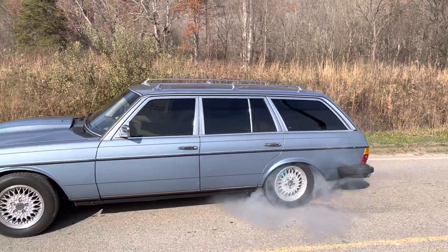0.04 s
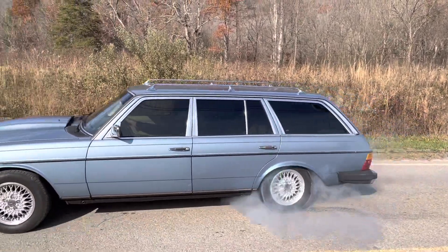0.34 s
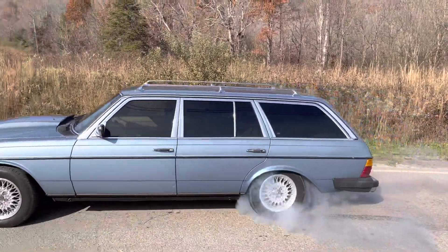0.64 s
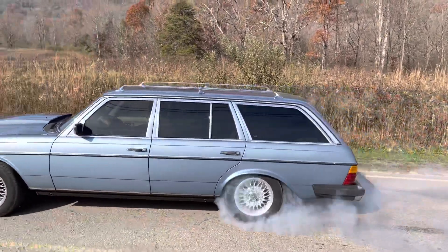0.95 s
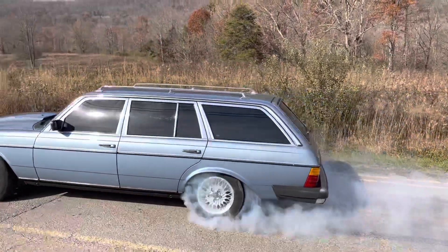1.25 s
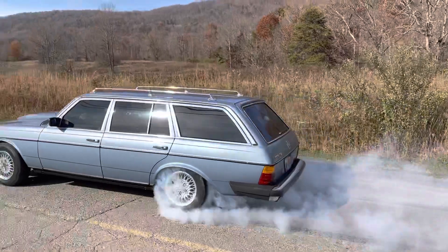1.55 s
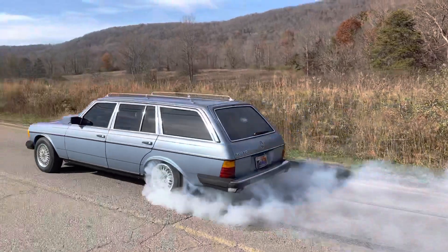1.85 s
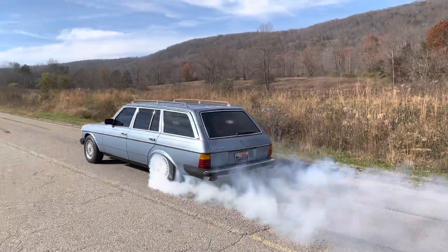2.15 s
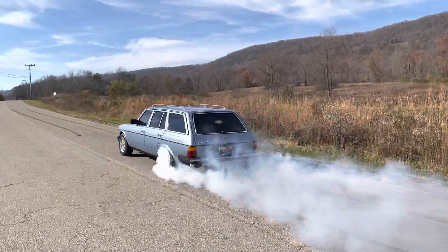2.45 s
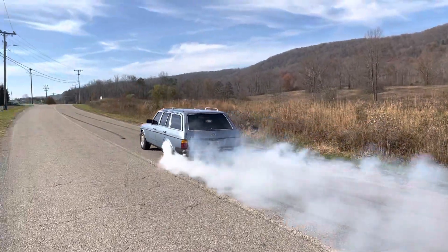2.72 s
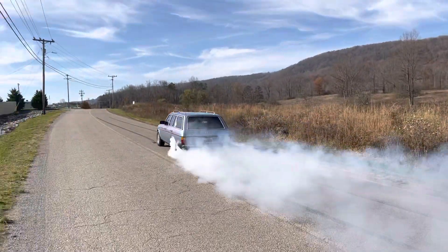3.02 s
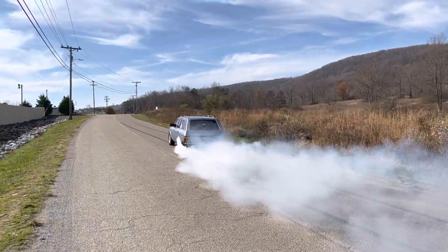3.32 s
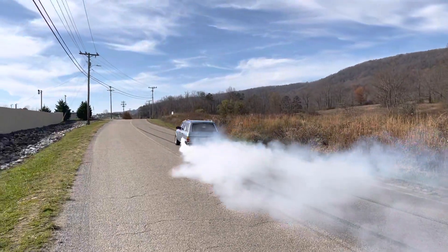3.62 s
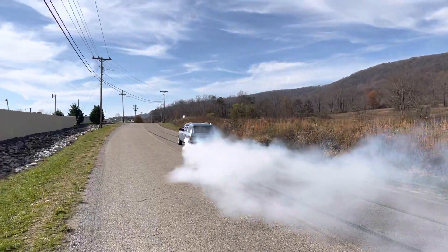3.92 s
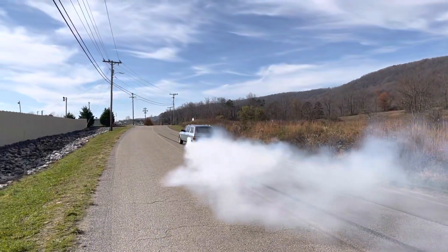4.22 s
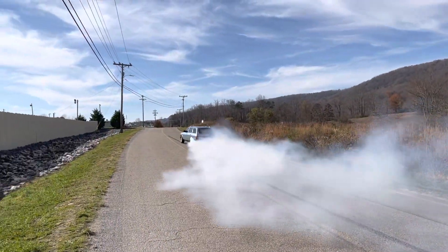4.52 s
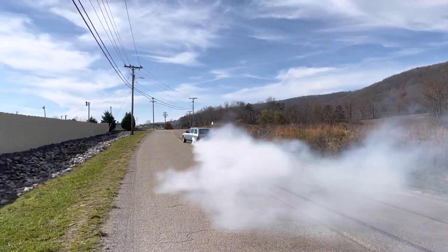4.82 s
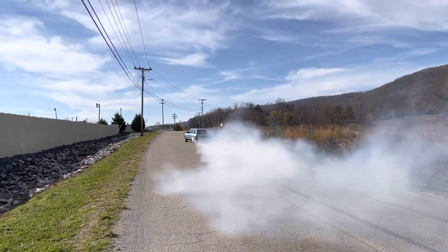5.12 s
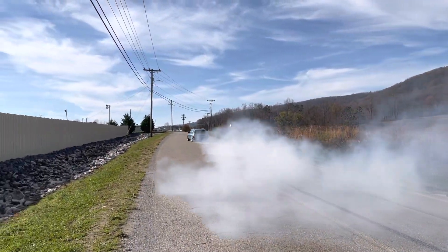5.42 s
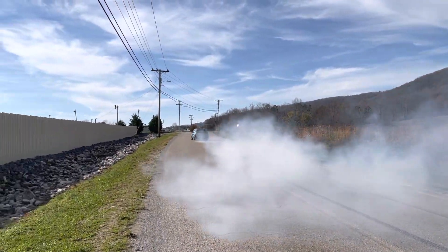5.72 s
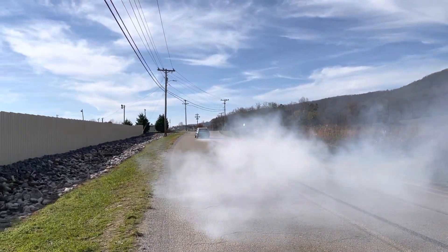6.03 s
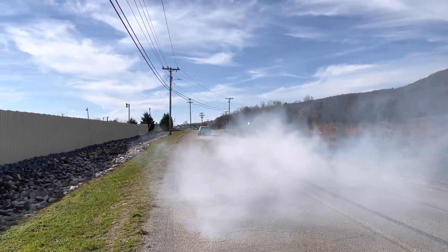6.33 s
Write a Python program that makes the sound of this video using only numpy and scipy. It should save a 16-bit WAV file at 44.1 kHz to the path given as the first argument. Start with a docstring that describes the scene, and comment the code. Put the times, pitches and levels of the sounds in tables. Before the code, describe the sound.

A V8 estate car creeps past close by in a burnout, its exhaust droning and rasping at high revs while the spinning tyres squeal, scrub and hiss on asphalt. The revs dip briefly, then hold as the car pulls away, the tyres chirping and whining more faintly. Far down the open country road the tyres grip and the revs fall, leaving a low, throbbing boom. Heard in stereo from the roadside.

```python
"""V8 burnout on a country road

A V8 estate car creeps past with its wheels spinning and drives off. Its exhaust drones on harmonics
(orders) of the engine cycle, shaped by resonance, and rasps with every firing. Sliding friction makes
the tyres scrub and hiss; stick-slip makes them squeal, chirp and whine. Far down the road the tyres
grip, the revs drop and a throbbing boom is left."""
import sys
import numpy as np
from scipy import signal
from scipy.fft import rfft, irfft, next_fast_len
from scipy.io import wavfile

SR = 44100
rng = np.random.default_rng(int(sys.argv[2]) if len(sys.argv) > 2 else 0)


def master_out(mix):
    """Clip the mix to full scale and print it as 16-bit PCM to the path in sys.argv[1]."""
    frames = np.transpose(np.atleast_2d(mix))
    ceiling = np.clip(frames, -1, 1)
    pcm = np.round(ceiling * 32767).astype(np.int16)
    wavfile.write(sys.argv[1], SR, pcm)


N = 284886
TIME = np.arange(N) / SR
TURN_START_S, TURN_S = 1.55, 0.53   # the car turns its tail to the listener
GRIP_S, GRIP_FADE_S = 4.56, 1.2     # the tyres regain their grip


# brief swells and dips of single exhaust orders: centre_s, length_s, order, gain_db
ORDER_SWELLS = [(0.047, 0.27, 16, 7), (.08, .2, 15, -1), (0.099, 0.3, 2, -3), (0.129, 0.18, 18, 7.5),
                (0.254, 0.28, 17, 10.5), (.3, .25, 12, 6), (.35, 0.84, 19, -18), (.35, 1, 20, -16),
                (0.41, 0.27, 15, 5.5), (.4, 0.25, 6, -11), (.5, 0.28, 10, -3), (0.55, 0.44, 16, 13.5),
                (.6, .35, 17, 0), (.67, 0.14, 15, 2), (.6, 0.33, 2, 2.5), (0.602, 0.49, 5, 7.5),
                (0.651, 0.16, 6, 2), (.7, .4, 14, -9), (.73, 0.25, 4, -9), (.85, .3, 12, -10),
                (0.882, 0.36, 13, -10), (1.024, 0.34, 5, 7), (1.22, 0.4, 8, 7), (1.296, 0.18, 3, 2),
                (1.45, .35, 5, -4), (1.45, 0.49, 9, 1), (1.47, 0.51, 18, 2), (1.57, 0.18, 19, 3.5),
                (1.547, 0.46, 19, 6.5), (1.62, 0.26, 6, -5), (1.673, 0.77, 8, -5.5), (1.733, 0.37, 15, 10),
                (1.801, 0.39, 7, 6.5), (1.9, 1, 17, -18), (1.92, 0.23, 10, 6), (2.1, .3, 9, -9),
                (2.4, 0.23, 18, 2), (2.499, 0.63, 12, 3), (2.7, 0.53, 19, 2), (2.903, .7, 6, -1.5),
                (3.28, 0.53, 2, -7), (3.701, 0.23, 3, 4.5), (3.85, 0.55, 5, 4), (3.951, .8, 9, 5),
                (4.4, 0.41, 13, -13), (4.8, 0.57, 8, -5), (5.03, .3, 4, 5), (5.033, .3, 6, 1.5),
                (5.099, .35, 7, 6), (5.197, .1, 8, -5), (5.313, 0.24, 6, -8), (5.404, 0.49, 8, 11.5),
                (5.794, .34, 8, 5), (5.9, 0.34, 6, 2.5), (6.1, .55, 7, 4.5), (6.324, 0.34, 8, 7.5),
                (6.357, 0.38, 6, 0)]

def engine_order(cycle_phase, order, level_db, waver_db, scatter_turns=1):
    """Harmonic motion: one partial, phase-locked to the engine cycle and wavering in strength."""
    swell_db = sum(db * bump(s, length) for s, length, k, db in ORDER_SWELLS if round(k) == order)
    phase = order * cycle_phase + scatter_turns * rng.uniform(0, 2 * np.pi)
    return np.sqrt(2) * from_db(level_db + swell_db + waver_db * drift(7.1)) * np.sin(phase)


# silencer resonances: frequency_hz, gain_db
SILENCER_RESPONSE = [(45, -21.5), (60, -2), (76, 1.5), (100, -11), (125, 4.5), (142, 9.5), (160, 8),
                     (185, 6), (210, 2.5), (260, 12.5), (285, 10), (310, -2), (520, 0.2), (590, 7.5),
                     (680, -1.5)]

def strong_orders(cycle_phase, cycle_hz, orders, doubling_loss_db, waver_db, scatter_turns=1):
    """Resonance and directivity: orders sweep through the silencer's peaks as the tailpipe turns."""
    behind = ramp(TURN_START_S, TURN_S)
    distance_db = doubling_loss_db * distance_doublings()
    out = 0
    for order, alongside_db, behind_db in orders:
        hz = round(order) * cycle_hz
        source_db = alongside_db + (behind_db - alongside_db) * behind
        # once the tyres grip, orders below 95 Hz fall away
        grip_db = -16 * ramp(GRIP_S, GRIP_FADE_S) / (1 + (hz / 95) ** 20)
        level_db = source_db + at_hz(SILENCER_RESPONSE, hz) - distance_db + grip_db
        out += engine_order(cycle_phase, round(order), level_db, waver_db, scatter_turns)
    return out


# weak orders fed by uneven cylinders: order, gain_db
BURBLE_ORDERS = [(3, -1), (9, -0.5), (10, 3), (11, -0.5), (12, 2.5), (13, 5), (14, 2.5), (21, -2.5),
                 (22, 1.5), (23, -6), (24, 4.5), (25, 2.5), (26, 1), (27, 0.5), (28, -0.5), (29, 6),
                 (30, -6.5), (32, 2)]
# exhaust pipe resonances: frequency_hz, gain_db
PIPE_RESPONSE = [(55, -4), (80, 1.5), (120, -1), (154, 22), (190, 1.5), (230, 1.5), (280, 3.5), (325, -3.5),
                 (360, -7), (410, 3), (490, -5.5), (600, 3), (740, -7), (1000, -6), (1300, -4)]

def weak_orders(cycle_phase, cycle_hz):
    """Periodicity: unequal cylinders repeat once a cycle, filling in orders between the strong ones."""
    burble_db = layer_db(-39, doubling_loss_db=3.9, spin_share=0.62) - 3 * ramp(GRIP_S, GRIP_FADE_S)
    out = 0
    for order, gain_db in BURBLE_ORDERS:
        hz = round(order) * cycle_hz
        # far off, the higher orders sink into the noise
        sink_db = -6.5 * ramp(3.57, 1.15) * np.clip((hz - 279) / 70, 0, 1)
        level_db = burble_db + gain_db + at_hz(PIPE_RESPONSE, hz) + sink_db
        out += engine_order(cycle_phase, round(order), level_db, waver_db=1.7)
    return out


# low, booming orders ahead of the silencer: order, alongside_db, behind_db
BOOM_ORDERS = [(2, -32, -31), (4, -38, -34), (5, -41.5, -41.5), (6, -37, -31), (7, -48.5, -47.5),
               (8, -40, -35.5)]
# higher, blaring orders ahead of the silencer: order, alongside_db, behind_db
BLARE_ORDERS = [(15, -31, -25.5), (16, -36, -30), (17, -39.5, -32), (18, -37.5, -37), (19, -34, -28.5),
                (20, -31.5, -44)]

def exhaust_tones(cycle_phase, cycle_hz):
    """Superposition: boom, blare and burble add up, each ragged because no two cycles burn alike."""
    boom = strong_orders(cycle_phase, cycle_hz, BOOM_ORDERS, doubling_loss_db=2.5, waver_db=0.78)
    blare = strong_orders(cycle_phase, cycle_hz, BLARE_ORDERS, doubling_loss_db=10.5, waver_db=1.5,
                          scatter_turns=0.22)
    load = 1 - ramp(GRIP_S, GRIP_FADE_S)
    boom *= from_db(0.25 * load * drift(25))
    blare *= from_db(0.9 * drift(70))
    burble = weak_orders(cycle_phase, cycle_hz) * from_db(0.7 * load * drift(18))
    lift_off = from_db(-7.5 * ramp(6.4, 0.029))   # the driver lifts off at the very end
    return (boom * pan(0.37) + blare * pan(1.1) + burble * pan(0.3)) * lift_off


def firing_puffs(cycle_phase, depth, lope):
    """Amplitude modulation: gas leaves in eight puffs a cycle, stronger on one cylinder bank."""
    imbalance = np.cos(3 * cycle_phase) + np.cos(cycle_phase)
    return unit_rms(np.exp(depth * np.cos(8 * cycle_phase) + lope * imbalance))


# low noise of the exhaust gas: frequency_hz, density_db
RUMBLE_SPECTRUM = [(25, -30), (45, -7.5), (70, -1.5), (130, 1), (200, -2), (250, -2), (320, -4), (400, -4),
                   (490, -2.5), (600, -0.5), (780, -13.5)]
# midrange noise of the exhaust gas: frequency_hz, density_db
RASP_SPECTRUM = [(450, -13.5), (600, 0.5), (720, -1), (820, 2), (900, 0), (1020, 2), (1140, -5), (1280, -4),
                 (1480, -10.5), (1900, -10), (2600, -24.5)]

def exhaust_noise(cycle_phase):
    """Turbulence: the gas jet rumbles and rasps in step with the firings."""
    ease_s = 0.95   # the revs first drop
    ease_db = -3 * bump(ease_s, 0.35)
    alongside_db = ramp(ease_s, TURN_S) - 1
    rumble_db = layer_db(-31, doubling_loss_db=4.3, spin_share=0.95) + ease_db + alongside_db
    rasp_db = layer_db(-24, doubling_loss_db=5.68, spin_share=0.41) - 3 * ramp(4.65, 0.3)
    rumble = from_db(rumble_db) * coloured_noise(RUMBLE_SPECTRUM, flicker_db=0.9, bands=3)
    rasp = from_db(rasp_db) * coloured_noise(RASP_SPECTRUM, flicker_db=1.5, bands=8)
    return (rumble + rasp) * firing_puffs(cycle_phase, depth=0.091, lope=0.043)


# rubber scrubbing on asphalt, near and far: frequency_hz, density_db
SCRUB_NEAR_SPECTRUM = [(1000, -6), (1400, -12), (1600, 1), (2000, 0), (2500, 1.5), (2900, -1.5), (3500, -3),
                       (3850, -5.5), (4250, -4), (5000, -5), (5700, -13), (7000, -77)]
SCRUB_FAR_SPECTRUM = [(1000, -23.5), (1400, -2.5), (1650, -3), (2000, 0.5), (2350, 2.5), (2750, -5),
                      (3600, -3), (4150, -9), (4600, -8.5), (5200, -9.5), (5600, -24.5), (7000, -26.5)]
# tyre hiss, near and far: frequency_hz, density_db
HISS_NEAR_SPECTRUM = [(4000, -22), (5300, 3.5), (5600, 0.5), (5900, 5), (6300, 2.5), (7200, 3.5),
                      (8000, 2.5), (9000, -10)]
HISS_FAR_SPECTRUM = [(4000, -19), (5050, -1), (5300, 7.5), (5550, -3.5), (5950, 5), (6400, 5.5), (7200, 2),
                     (9000, -4.5)]
# the top treble of the tyre noise: frequency_hz, density_db
SIZZLE_SPECTRUM = [(9000, 3), (10500, -0.5), (12300, -4), (13600, 2), (14500, -7.5), (15600, -12.5)]

def tyre_friction(cycle_phase):
    """Sliding friction: rubber tears over asphalt in broadband noise that dulls as the car leaves."""
    far = ramp(1.9, 1.2)
    tearing_db = 1.5 * bump(0.2, 0.6) + 1.3 * bump(2.15, 0.45) + 1.3 * bump(2.8, 0.4)
    scrub_db = layer_db(-28.5, doubling_loss_db=6.9, spin_share=0.89) + tearing_db
    near_scrub = np.sqrt(1 - far) * coloured_noise(SCRUB_NEAR_SPECTRUM, flicker_db=1.33, bands=6)
    far_scrub = np.sqrt(far) * coloured_noise(SCRUB_FAR_SPECTRUM, flicker_db=0.53, bands=6)
    scrub = from_db(scrub_db) * (near_scrub + far_scrub)

    passing_db = 4.57 * bump(1.67, 0.97)   # the spinning wheel goes by
    bite_db = 5 * bump(5.15, 0.07)         # a last spit as the tyres bite
    hiss_db = layer_db(-36.5, doubling_loss_db=6.77, spin_share=1.57) + passing_db + bite_db + 2.1 * far
    near_hiss = np.sqrt(1 - far) * coloured_noise(HISS_NEAR_SPECTRUM, flicker_db=1, bands=3)
    far_hiss = np.sqrt(far) * coloured_noise(HISS_FAR_SPECTRUM, flicker_db=1, bands=3)
    hiss = from_db(hiss_db) * (near_hiss + far_hiss)

    air_loss_db = 4.5 * ramp(4.8, 0.8)     # air absorbs the very top far down the road
    sizzle_db = layer_db(-34, doubling_loss_db=8.76, spin_share=1.14) + 0.42 * passing_db - air_loss_db
    sizzle = from_db(sizzle_db) * coloured_noise(SIZZLE_SPECTRUM, flicker_db=1.5, bands=1)
    grit = from_db(0.59 * drift(400))
    return (scrub + hiss + sizzle) * grit * firing_puffs(cycle_phase, depth=0.056, lope=0.03)


# squeals of sliding rubber: start_s, end_s, start_hz, end_hz, width_hz, level_db, fade_db_per_s
SQUEAL_BANDS = [(-.2, 1.3, 1850, 1820, 80, -23.5, 10.5), (-.2, 1.04, 1275, 1290, 70, -32, 2.5),
                (-.2, 1, 3250, 3150, 350, -30.5, 8.5), (0.999, 2.7, 1253, 1303, 150, -30.5, 4),
                (1.1, 4.4, 1558, 1390, 120, -31.5, 6), (1.8, 3.7, 2160, 1960, 150, -34, 5),
                (2.302, 4.6, 1035, 992, 60, -39, 1.5), (1.8, 2.6, 4240, 3790, 50, -47, 2),
                (1.9, 3.3, 3594, 3110, 50, -42, 8), (.75, 1.9, 920, 790, 130, -31, 2.5),
                (3.4, 4, 1560, 1347, 110, -41, 4), (4.15, 5, 850, 800, 60, -45.5, 10)]

def tyre_squeals(edge_s=0.19):
    """Stick-slip: tread blocks slip out of step, making narrow noise bands round a gliding pitch."""
    out = 0
    for start, end, start_hz, end_hz, width_hz, db, fade_db_per_s in SQUEAL_BANDS:
        hz = start_hz + (end_hz - start_hz) * ramp(start, end - start)
        phase = wandering_phase(hz, spread=0.00914, rate_hz=11.75)
        mid, side = (drift(width_hz) * np.cos(phase) + drift(width_hz) * np.sin(phase) for _ in range(2))
        level_db = db - fade_db_per_s * np.maximum(TIME - start, 0) + 1.43 * drift(17)
        sounding = ramp(start, edge_s) - ramp(end - edge_s, edge_s)
        out += sounding * from_db(level_db) * (mid + from_db(-11) * side * [[1], [-1]])
    return out * pan(0.76)


# moments when the tyre catches the road: centre_s, length_s, pitch_hz, level_db
SCUFF_YELPS = [(.44, .05, 1020, -22), (.63, .07, 1300, -24), (.64, .05, 1900, -24), (.88, .08, 950, -25),
               (1.03, .07, 935, -25), (1.1, .04, 1430, -26.5), (1.113, .04, 895, -18),
               (1.32, .09, 1150, -25), (1.66, .1, 820, -25), (1.78, .04, 1205, -23.5), (1.91, .1, 965, -27),
               (2.02, .06, 1080, -27), (2.25, .05, 1205, -28), (2.57, .08, 818, -26), (2.85, .06, 990, -27),
               (3.26, .07, 1035, -29)]

def tyre_scuffs():
    """Frequency modulation: fast, random pitch jitter makes a ragged yelp where the rubber bites."""
    out = 0
    for centre, length, hz, db in SCUFF_YELPS:
        phase = wandering_phase(hz, spread=0.06, rate_hz=151.7)
        out += from_db(db) * bump(centre, length) * np.sin(phase)
    return out


def tread_chirps(per_s, mean_length_s, low_hz, high_hz, sag_per_s=0.12):
    """Friction-driven vibration: single tread blocks sing at random times and pitches, each sagging."""
    out = np.zeros((2, N + SR))
    for when, pitch, length, size, side in rng.random((int(per_s * N / SR), 5)):
        t = np.arange(int(mean_length_s * (0.5 + length) * SR)) / SR
        hz = low_hz + (high_hz - low_hz) * pitch
        level_db = -4.5 * np.log2(hz / low_hz) + 3 * (2 * size - 1)
        envelope = from_db(level_db) * np.sin(np.pi * t / t[-1])
        chirp = envelope * np.sin(2 * np.pi * hz * t * (1 - sag_per_s * t / 2))
        start = int(when * N)
        out[:, start:start + len(t)] += chirp * pan(at_hz(STEREO_BALANCE, hz) + 6 * (2 * side - 1))
    return out[:, :N]


def tyre_tread():
    """Incoherent addition: high chirps merge all along, and lower ones chatter as the car pulls away."""
    chirps = tread_chirps(per_s=110, mean_length_s=0.09, low_hz=2409, high_hz=5192)
    chirps *= from_db(layer_db(-40, doubling_loss_db=6.6, spin_share=0.82))
    chatter = tread_chirps(per_s=32, mean_length_s=0.04, low_hz=930, high_hz=1130)
    chatter *= from_db(layer_db(-26, doubling_loss_db=5.2, spin_share=0.5))
    return chirps + chatter * bump(3.4, 2.0)


# brief tones of the tread: start_s, end_s, start_hz, end_hz, level_db
WHINE_GLIDES = [(3.08, 3.42, 1505, 1455, -45), (3.54, 4.02, 1925, 1780, -42.5),
                (4.15, 4.58, 1315, 1215, -43.5), (4.39, 4.47, 1265, 1245, -43),
                (4.45, 4.59, 2070, 2030, -47.5), (4.16, 4.42, 634, 618, -42)]

def tyre_whines():
    """Periodic excitation: the tread sings for moments, falling in pitch as the wheels slow."""
    out = 0
    for start, end, start_hz, end_hz, db in WHINE_GLIDES:
        progress = ramp(start, end - start)
        phase = wandering_phase(start_hz + (end_hz - start_hz) * progress, spread=0.002, rate_hz=53)
        envelope = np.sqrt(np.abs(np.sin(np.pi * progress))) * from_db(db + 2.5 * drift(27))
        out += np.sqrt(2) * envelope * np.sin(phase)
    return out


def driveline_hum(cycle_phase, order=5.45):
    """Beating: a hum lying between two engine orders beats against them while the revs first climb."""
    envelope = from_db(-31 + 2 * drift(7.5)) * bump(0.35, 0.85)
    return np.sqrt(2) * envelope * np.sin(order * cycle_phase)


# open-air background: frequency_hz, density_db
OUTDOOR_SPECTRUM = [(25, -12), (55, -4), (110, -7.5), (300, -14), (600, -8), (800, -13.5), (1000, -1),
                    (1250, -13.5), (1900, -13.5), (2600, -32), (3800, -28), (7000, -47.5)]

def open_air():
    """Ambient noise: a faint, wavering floor, mostly masked by the car."""
    return from_db(-54) * coloured_noise(OUTDOOR_SPECTRUM, flicker_db=2, bands=1)


# the car creeps past, then gathers speed: time_s, distance_m
CAR_PATH = [(0, 3.86), (1.6, 4.36), (2, 5.66), (2.5, 7.36), (3, 10.3), (4, 18.9), (5, 26.2), (6.46, 50)]

def distance_doublings():
    """Geometric spreading: level falls with each doubling of distance from the closest point."""
    metres = at_times(CAR_PATH)
    return np.log2(metres / metres.min())


# how hard the wheels spin: time_s, gain_db
WHEELSPIN_CURVE = [(.2, 1.5), (.9, -0.5), (1.3, 1), (3.2, -0.5), (3.55, 1.5), (4.55, 0.5), (4.75, -1),
                   (5.1, -3.5), (5.22, -13.5), (5.45, -12), (5.65, -8), (5.9, -9.5), (6.46, -17)]

def layer_db(base_db, doubling_loss_db, spin_share):
    """Gains add in decibels: a layer rises with wheelspin and falls with distance."""
    return base_db - doubling_loss_db * distance_doublings() + spin_share * at_times(WHEELSPIN_CURVE)


# level difference between the channels: frequency_hz, left_minus_right_db
STEREO_BALANCE = [(120, -.5), (330, -.5), (600, 4), (900, -.5), (1800, -.7), (2300, 1), (2800, 5.5),
                  (3400, 2.7), (4300, .3), (5200, 3), (6000, 0), (7200, 2), (7800, 0)]
# stereo width of the noise: frequency_hz, side_minus_mid_db
STEREO_WIDTH = [(60, -30), (130, -23), (260, -8.5), (400, -5), (800, -10.5), (1600, -5.5), (3400, -7),
                (5000, -3.5), (6400, -6.5), (7400, -16.5), (8300, -43), (9200, -31), (10500, -7),
                (12300, -9), (14000, -43)]

def coloured_noise(spectrum, flicker_db, bands):
    """Spectral shaping: stereo noise takes a spectrum's shape, in bands that flicker independently."""
    hz = np.fft.rfftfreq(N, 1 / SR) + 1e-3
    colour = from_db(at_hz(spectrum, hz, left=-100, right=-100))
    mid, side = rfft(rng.standard_normal((2, N))) * unit_rms(colour)
    side *= from_db(at_hz(STEREO_WIDTH, hz))
    stereo = np.array([mid + side, mid - side]) * pan(at_hz(STEREO_BALANCE, hz))
    edges_hz = np.geomspace(spectrum[0][0], spectrum[-1][0], bands + 1)
    band = np.digitize(hz, edges_hz[1:-1])
    return sum(irfft(stereo * (band == k), N) * from_db(flicker_db * drift(13.8)) for k in range(bands))


def drift(rate_hz):
    """Low-pass filtered noise: a random fluctuation of unit rms, mostly slower than rate_hz."""
    hop, settling_steps = 40, 2000
    pole = np.exp(-2 * np.pi * rate_hz * hop / SR)
    white = rng.standard_normal(N // hop + settling_steps + 2)
    slow = signal.lfilter([1], [1, -2 * pole, pole * pole], white)[settling_steps:]
    return np.interp(np.arange(N) / hop, np.arange(len(slow)), unit_rms(slow))


def wandering_phase(hz, spread, rate_hz):
    """Phase is the integral of frequency, which here wanders by the fraction spread."""
    return 2 * np.pi * np.cumsum(hz * (1 + spread * drift(rate_hz))) / SR


def ramp(start_s, length_s):
    """Linear envelope from 0 to 1."""
    return np.clip((TIME - start_s) / length_s, 0, 1)


def bump(centre_s, length_s):
    """Flat-topped envelope of height 1."""
    return np.exp(-np.minimum((2 * (TIME - centre_s) / length_s) ** 2, 6) ** 2)


def at_times(curve):
    """Linear interpolation of a curve at every sample."""
    return np.interp(TIME, *np.transpose(curve))


def at_hz(points, hz, **ends):
    """Interpolation on a log-frequency axis."""
    point_hz, value = np.transpose(points)
    return np.interp(np.log(hz), np.log(point_hz), value, **ends)


def pan(db):
    """Level panning: gains for a left-minus-right difference."""
    return from_db(np.array([[0.5], [-0.5]]) * db)


def from_db(db):
    """Decibels to amplitude ratio."""
    return 10 ** (np.asarray(db) / 20)


def unit_rms(x):
    """Normalisation to an rms of 1."""
    return x / np.sqrt(np.mean(x ** 2) + 1e-20)


# engine speed in four-stroke cycles, eight firings to each: time_s, cycle_hz
ENGINE_SPEED = [(0, 35.4), (.4, 37.95), (.66, 39.1), (.75, 37.9), (.89, 33.0), (1.05, 31.9), (1.75, 34.55),
                (2.55, 34.6), (2.9, 33.8), (3.6, 31.4), (4.4, 27.65), (5.14, 22.8), (5.27, 20.5),
                (5.39, 19.8), (5.75, 21.15), (6.07, 20.75), (6.27, 19.2), (6.46, 18.3)]

def scene():
    """Superposition of all sources: one engine cycle times the exhaust tones and the pulsing noise."""
    cycle_hz = at_times(ENGINE_SPEED)
    cycle_phase = wandering_phase(cycle_hz, spread=0.0017, rate_hz=23.4)
    whines = tyre_whines()
    exhaust = exhaust_tones(cycle_phase, cycle_hz) + exhaust_noise(cycle_phase)
    hum = driveline_hum(cycle_phase)
    tyres = tyre_friction(cycle_phase) + tyre_squeals() + tyre_scuffs() + tyre_tread() + whines
    return exhaust + tyres + hum + open_air()


# phase lead of the left microphone port over the right: frequency_hz, alongside_rad, behind_rad
PORT_PHASE_LEAD = [(60, 0, 0), (150, .03, .08), (350, -.15, .2), (560, .5, .6), (750, .05, .75),
                   (1000, .05, .4), (1300, .05, .8), (1500, .7, .55), (1800, .1, .25), (2200, .3, .7),
                   (2600, .7, 1.15), (3400, 1.45, .7), (4100, -.3, 1), (4800, .7, 1.35), (5300, .7, 1.3),
                   (5800, -1.2, -1.6), (6700, -.65, -.4), (7700, -2.6, -2.9), (8200, -3.1, -3.13),
                   (9100, -3.2, -3.16), (9700, -3.6, -3.6), (10500, -4.5, -4.5), (11600, -5.3, -5.3),
                   (12600, -6.3, -6.3)]

def spaced_ports(sound, settle_s=1.7):
    """Path difference: two ports differ in phase as the car turns, and are opposed near 8.6 kHz."""
    size = next_fast_len(N + SR)
    spectrum = rfft(sound, size)
    hz = np.fft.rfftfreq(size, 1 / SR) + 1e-3
    port_hz, *leads_rad = np.transpose(PORT_PHASE_LEAD)
    bearings = []
    for lead_rad in leads_rad:
        lead = at_hz(list(zip(port_hz, lead_rad)), hz)
        phase_shift = np.exp(np.array([[0.5j], [-0.5j]]) * lead)
        bearings.append(irfft(spectrum * phase_shift, size)[:, :N])
    alongside, behind = bearings
    return alongside + (behind - alongside) * ramp(TURN_START_S, settle_s)


def record(dry):
    """Band limiting: a pair of close microphone ports feeds a steep low-pass filter."""
    cutoff_hz = 15600
    low_pass = signal.ellip(10, 0.1, 80, cutoff_hz, fs=SR, output="sos")
    return signal.sosfilt(low_pass, spaced_ports(dry))


dry = scene()
out = record(dry)
master_out(out)
```